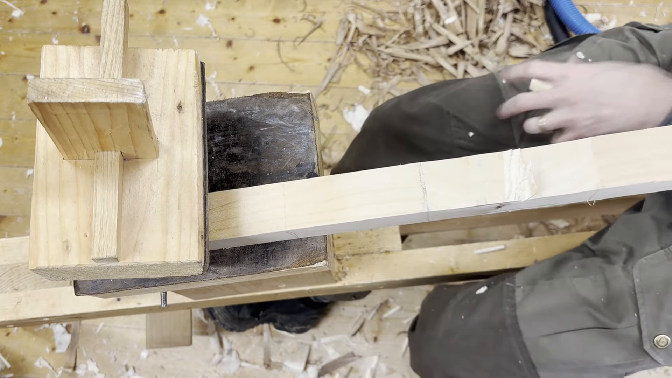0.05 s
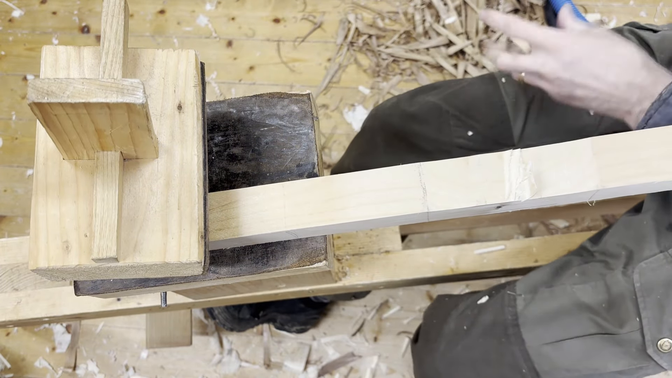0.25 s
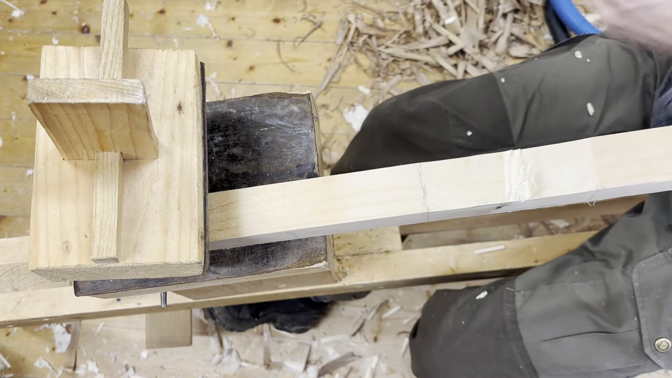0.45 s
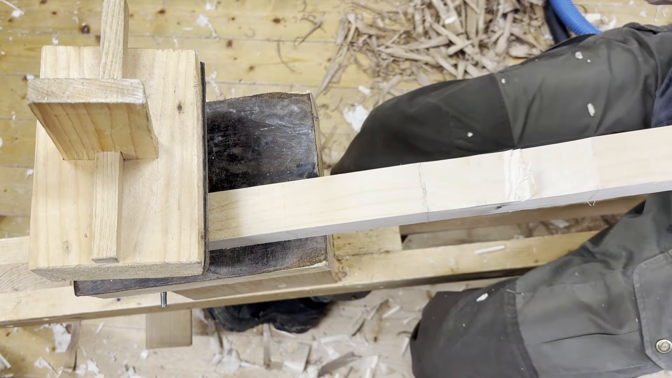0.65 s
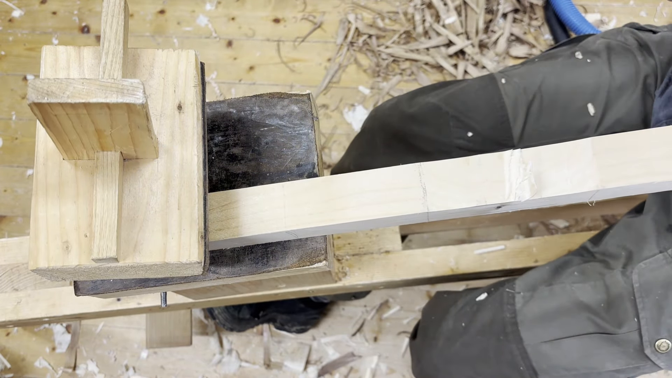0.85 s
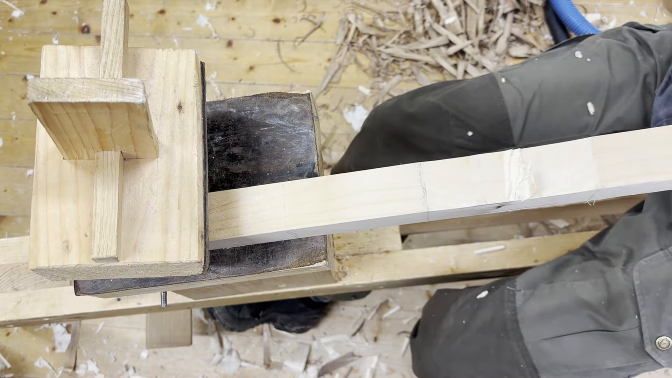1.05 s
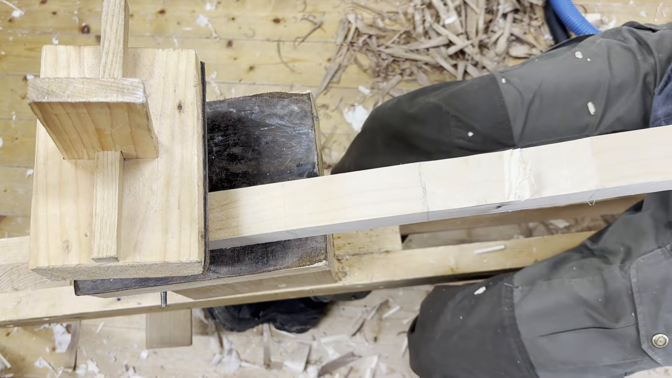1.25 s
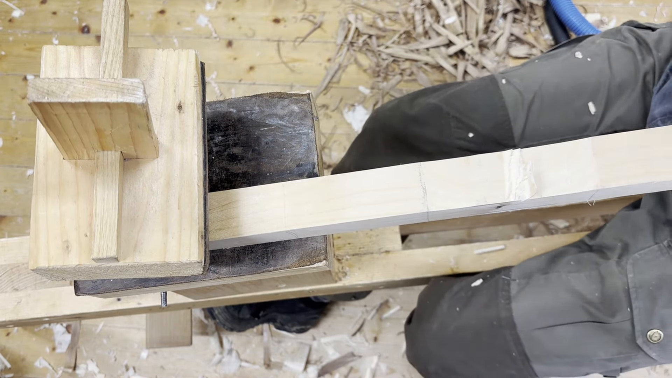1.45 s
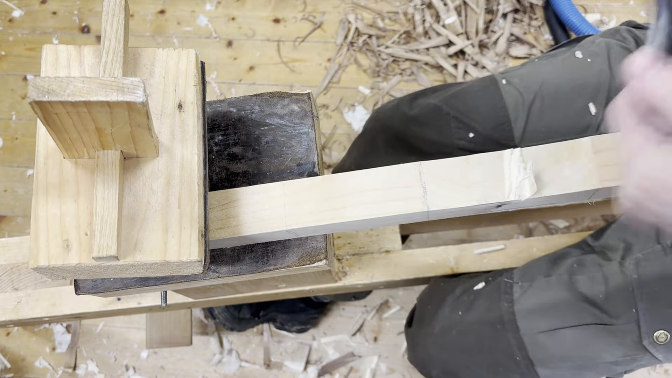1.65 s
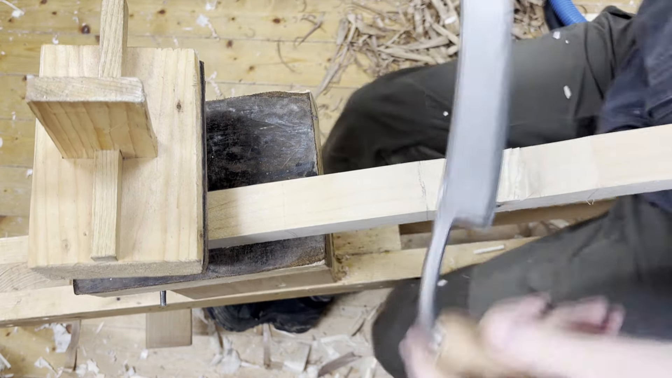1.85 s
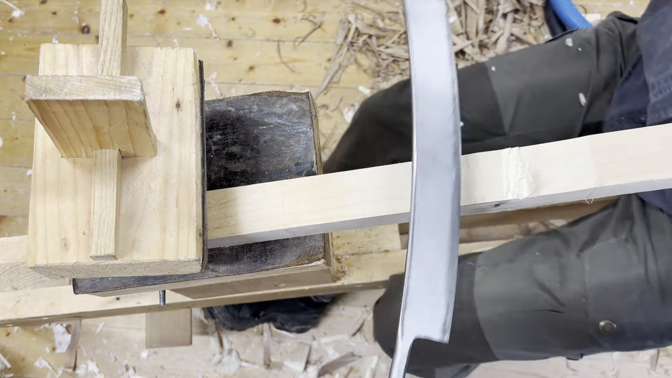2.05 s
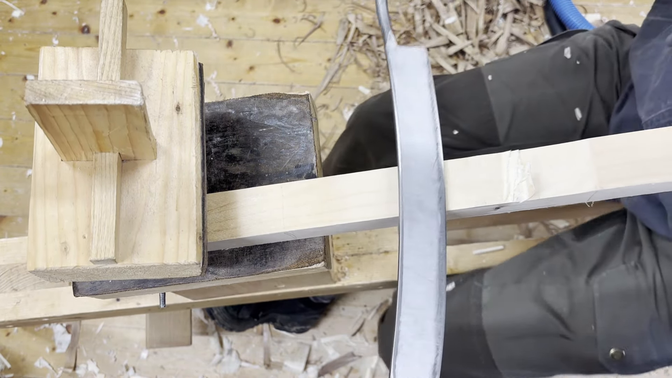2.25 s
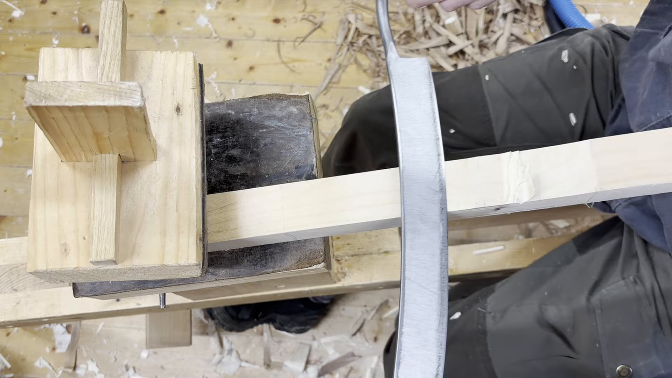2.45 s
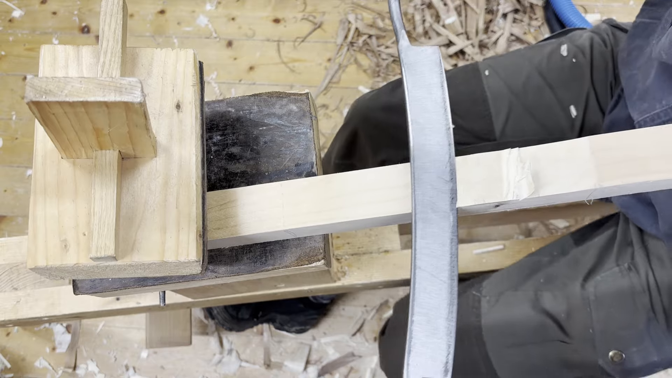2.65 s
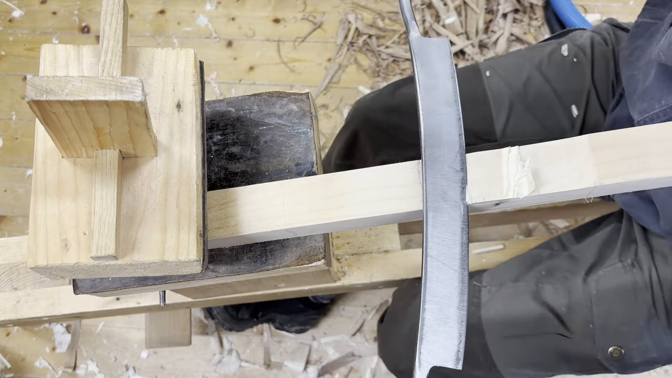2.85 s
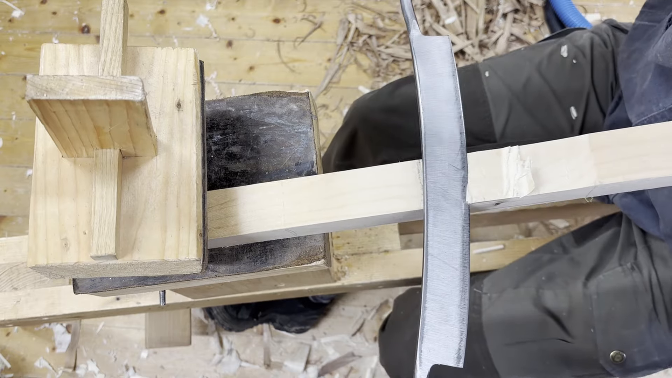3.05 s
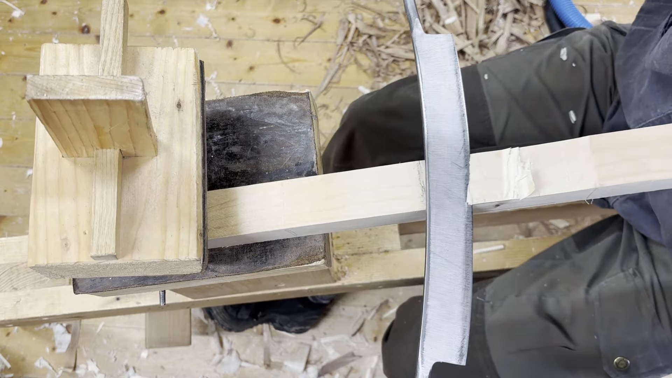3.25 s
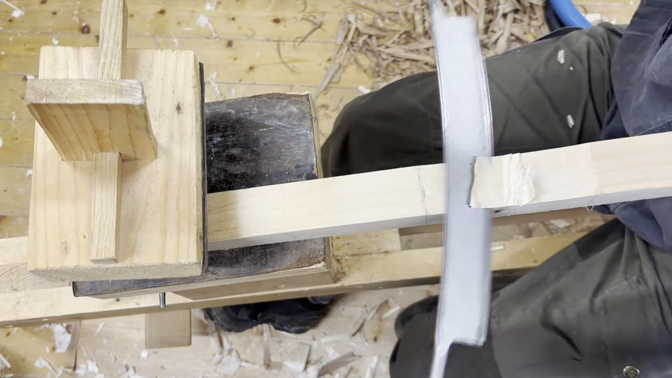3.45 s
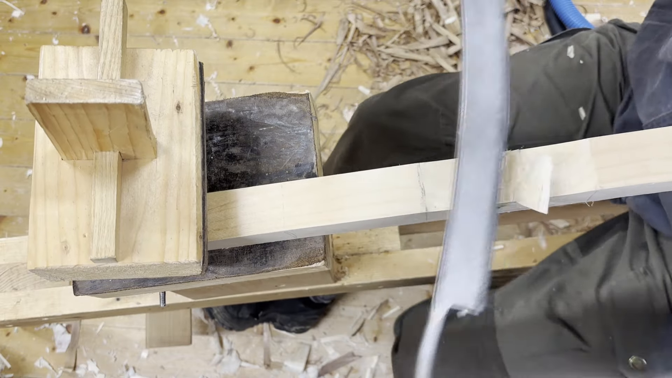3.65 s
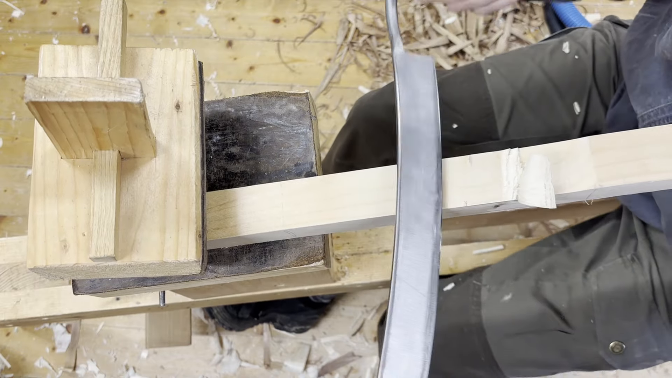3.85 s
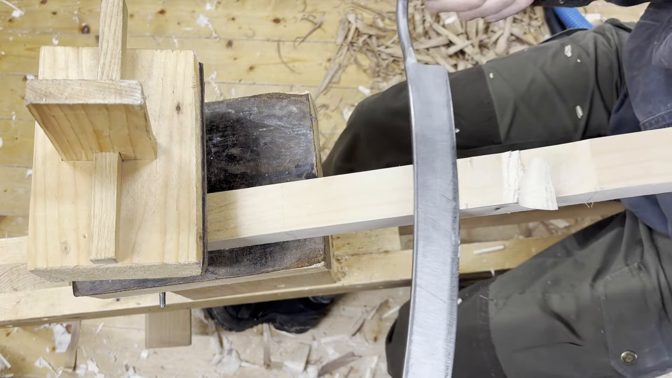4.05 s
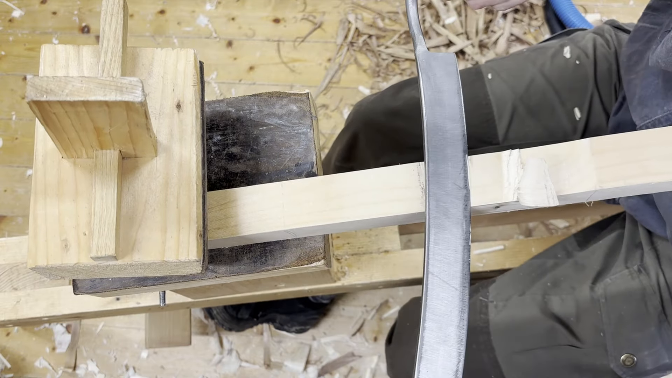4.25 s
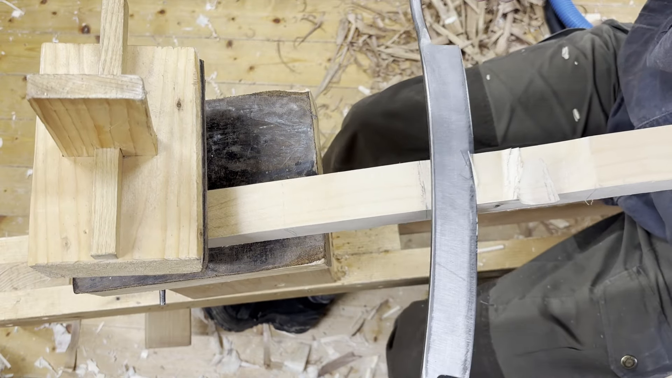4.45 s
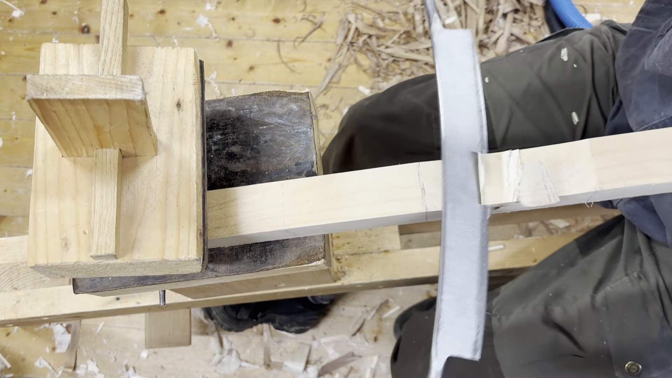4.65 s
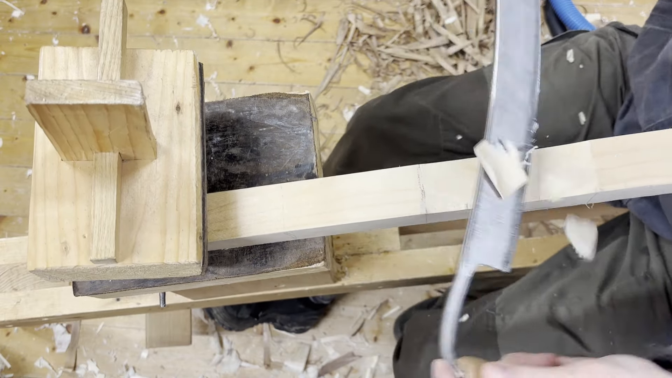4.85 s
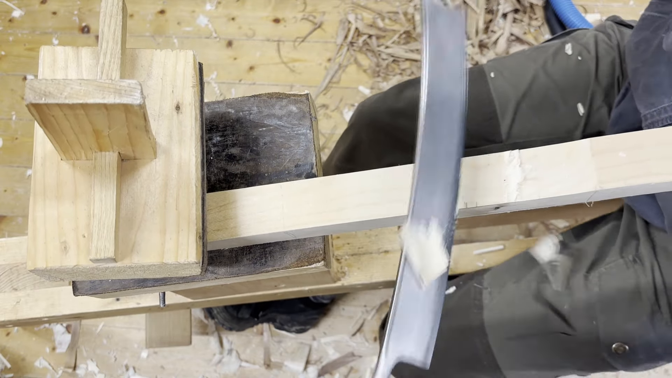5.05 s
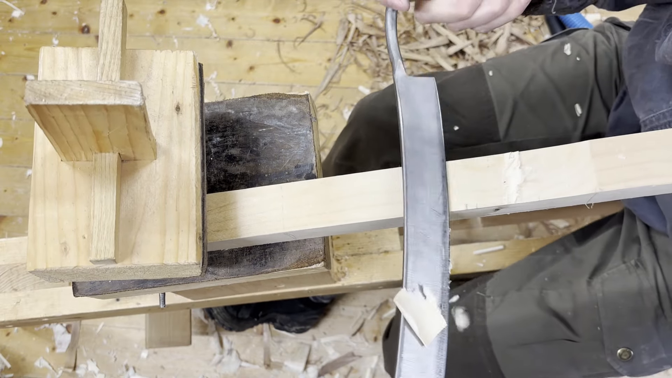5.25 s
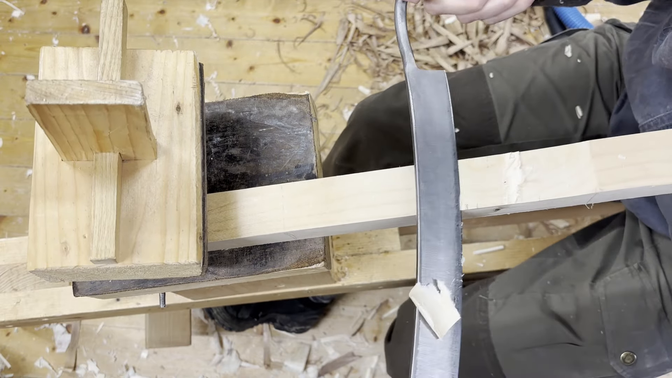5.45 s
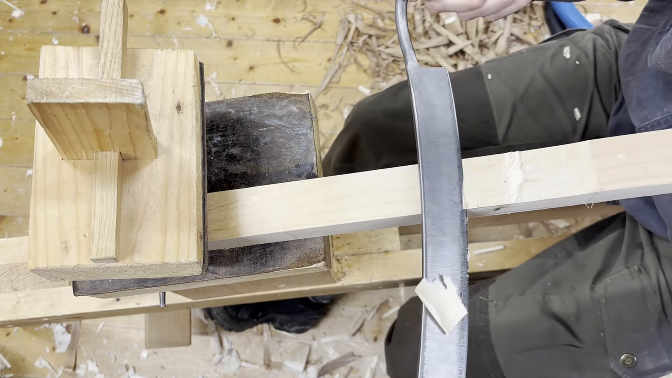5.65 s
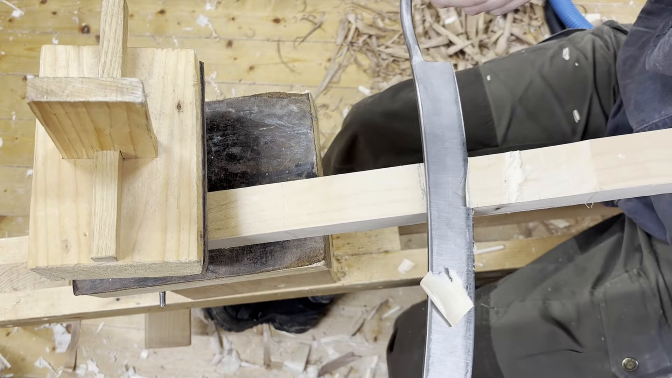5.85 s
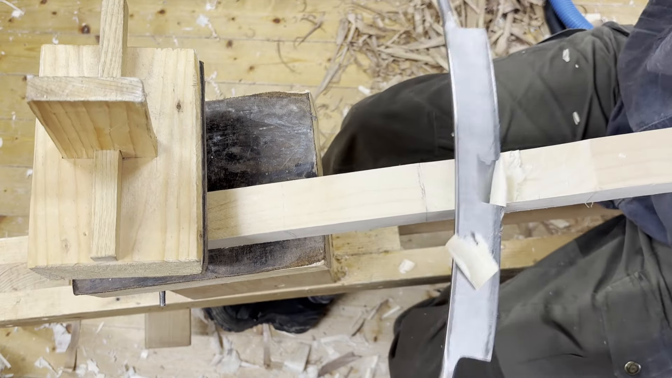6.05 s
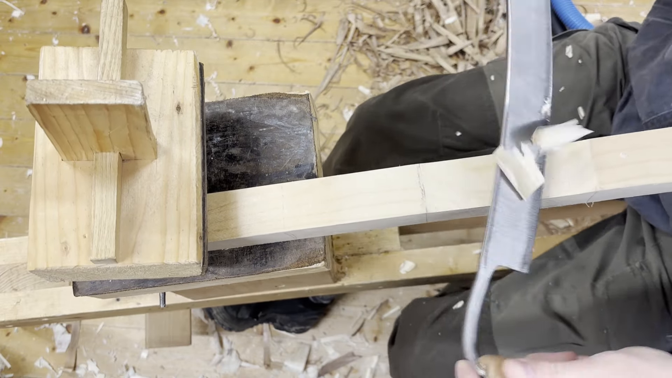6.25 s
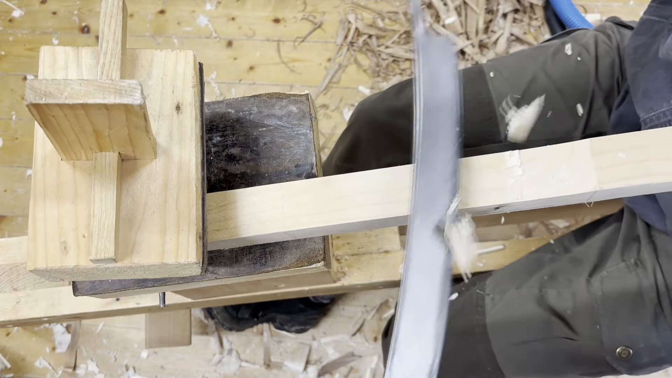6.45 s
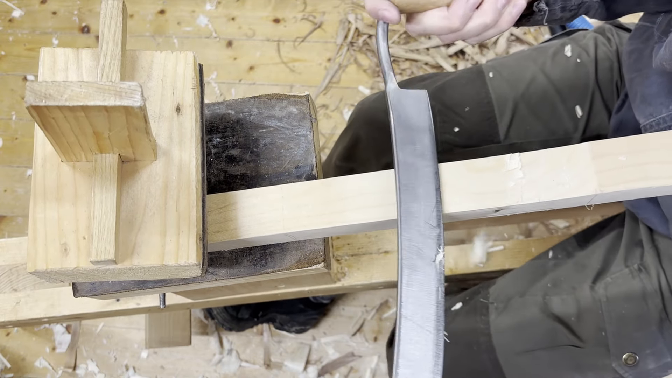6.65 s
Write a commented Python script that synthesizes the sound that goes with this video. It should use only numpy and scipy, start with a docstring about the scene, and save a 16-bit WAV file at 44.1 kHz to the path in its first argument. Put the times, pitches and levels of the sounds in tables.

```python
"""Clothes rustle and a tool knocks on wood at a shaving horse, then a drawknife is set down on a stick in a
brief scrape and makes three short cuts. In each the edge bites, the force builds and the chip gives:
ruptures crackle in clumps and shake the stick. Splinters snap as bright noise bursts; knocks excite decaying
modes and a rattle; thuds push the bench and set its frame ringing; cloth is grainy friction noise. A small,
dry workshop answers with decaying noise, heard from close above through two ports that differ in phase."""
import sys
import numpy as np
from scipy import signal
from scipy.fft import rfft, irfft, next_fast_len
from scipy.io import wavfile
from scipy.ndimage import uniform_filter1d, map_coordinates

SR = 44100
rng = np.random.default_rng(int(sys.argv[2]) if len(sys.argv) > 2 else 0)


def to_wav(s):
    """Save 16-bit WAV."""
    ch = np.atleast_2d(s).T  # columns
    pcm = np.round(np.clip(ch, -1, 1) * 32767)  # PCM
    wavfile.write(sys.argv[1], SR, pcm.astype(np.int16))


N = 295470

# the tool knocking on the stick: [start_s, level_db, contact_pitch_hz, contact_t60_s, crack_db, edge_tick_db]
CONTACTS = [(0.987, -46.5, 430, 0.04, -58, -70), (0.999, -45, 610, 0.07, -62, -83),
            (1.559, -48.5, 1600, 0.011, -53, -46.5), (1.689, -24, 630, 0.056, -26.5, -26),
            (1.752, -29, 600, .05, -35, -44), (1.909, -22, 1040, 0.024, -40, -35),
            (1.933, -21.5, 350, 0.04, -53, -55), (2.347, -27, 1010, 0.017, -36.5, -62),
            (2.352, -26, 640, 0.066, -56, -70), (2.394, -31, 360, 0.055, -67, -65),
            (2.859, -30.5, 1060, 0.012, -34, -31), (3.789, -43.5, 1088, 0.039, -54, -43),
            (4.018, -41.5, 840, 0.03, -54, -44), (4.771, -25, 520, 0.048, -29.5, -23),
            (5.045, -43.5, 550, 0.035, -53.5, -48.5), (5.232, -44, 840, 0.008, -50, -49),
            (5.311, -40.5, 1236, 0.036, -53, -43), (5.3273, -28, 681, 0.03, -33, -34),
            (5.41, -42, 1044, 0.025, -44.5, -33), (5.749, -25.5, 950, 0.015, -39, -28),
            (5.849, -43.5, 1020, 0.028, -51, -51), (6.025, -25.5, 850, 0.017, -39, -31),
            (6.536, -41.5, 567, 0.053, -43, -47)]
# resonances of the clamped stick: [mode_hz, relative_db, t60_s]
STICK_MODES = [(335, -4, 0.15), (450, 5.5, 0.17), (632, 0, 0.13), (765, -1, 0.08), (986, -1, 0.11),
               (1170, 0, .1), (1873, -3, 0.09), (2380, -3, 0.074)]
# spectrum of parting fibres: [frequency_hz, relative_db]
FIBRE_SPECTRUM = [(600, -39.5), (2000, -8), (2800, 7), (4200, -10.5), (5200, -.5), (6600, -4), (9300, -1.5),
                  (11800, 2), (13600, -4), (16000, 2.5)]
# spectrum of the bench's low rumble: [frequency_hz, relative_db]
RUMBLE_SPECTRUM = [(20, -13), (45, -7.5), (66, 9.5), (90, -4), (180, -5.5), (300, -10.5), (600, -39),
                   (2000, -86)]
# the loose joints of the bench rattling after a blow
RATTLE_LOW_HZ, RATTLE_T60_S = 171, 0.23


def amp(db):
    """Level to amplitude ratio: 20 dB is a factor of ten."""
    return 10 ** (np.asarray(db) / 20)


def unit(x):
    """Normalisation by effective value: scaled to rms 1."""
    return x / np.sqrt(np.mean(x ** 2) + 1e-20)


def along(points, hz):
    """Interpolation on a logarithmic frequency axis through (frequency_hz, value) points."""
    point_hz, value = np.transpose(points)
    return np.interp(np.log(hz + 1), np.log(point_hz), value)


def add(track, s, sound):
    """Superposition: mix a sound into a track at s seconds."""
    part = track[round(s * SR):][:len(sound)]
    part += sound[:len(part)]


def filtered(x, response):
    """Linear filtering: the spectrum of x times a complex response of frequency."""
    n = x.shape[-1]
    padded = next_fast_len(n + 8192)
    hz = np.fft.rfftfreq(padded, 1 / SR)
    return irfft(rfft(x, padded) * response(hz), padded)[..., :n]


def coloured(x, gain):
    """Minimum phase: x through the causal filter that has this gain of frequency."""
    size = 8192
    log_gain = np.log(np.maximum(gain(np.fft.rfftfreq(size, 1 / SR)), 1e-6))
    cepstrum = irfft(log_gain)
    # folding the cepstrum onto positive times makes the filter causal
    cepstrum[1:size // 2] *= 2
    cepstrum[size // 2 + 1:] = 0
    impulse_response = irfft(np.exp(rfft(cepstrum)))
    return signal.fftconvolve(x, impulse_response)[:len(x)]


def shaped(x, spectrum):
    """Spectral shaping: x filtered by (frequency_hz, relative_db) points, at rms 1."""
    return unit(coloured(x, lambda hz: amp(along(spectrum, hz))))


def wobble(rate):
    """Random modulation: straight lines between random knots, rate knots a second."""
    knots = rng.standard_normal(int(N * rate / SR) + 4)
    return map_coordinates(knots, [np.arange(N) * rate / SR], order=1)


def crackle(density, spread_db, clump_db):
    """Shot noise: tiny ruptures of uneven size, density a second, whose strength swells in clumps."""
    breaks = (rng.random(N) < density / SR) * rng.standard_normal(N)
    return breaks * amp(spread_db * rng.standard_normal(N) + clump_db * wobble(rate=320))


def patchy(x, patchy_db):
    """Spectral fluctuation: the level drifts at random over time and frequency."""
    z = signal.stft(x, nperseg=512)[2]
    field = uniform_filter1d(rng.standard_normal(z.shape), size=6, axis=0)
    field = uniform_filter1d(field, size=3, axis=1)
    return unit(signal.istft(z * amp(patchy_db * unit(field)), nperseg=512)[1][:N])


def band_noise(t, low_hz, top_hz):
    """Band limiting: noise of rms 1 that fades gently below low_hz and steeply above top_hz."""
    def band(hz):
        return hz ** 2 / (hz ** 2 + low_hz ** 2) / np.sqrt(1 + (hz / top_hz) ** 8)
    return unit(coloured(rng.standard_normal(len(t)), band))


def burst(noise, t, t60):
    """Exponential decay: noise that starts near rms 1 and falls 60 dB in t60 seconds."""
    fade = amp(-60 * t / t60)
    return noise * fade * np.linalg.norm(fade) / np.linalg.norm(noise * fade)


def stick_gain(hz, width_hz):
    """Modal response: the stick's resonances over a bed of densely packed modes."""
    # the bed of dense modes: [frequency_hz, relative_db]
    dense_modes = [(100, -21), (250, -12), (480, -2), (1050, -2), (1500, -7), (2200, 0), (3200, 1),
                   (6000, -23), (16000, -69)]
    peaks = sum(amp(db) / (1 + ((hz - centre_hz) / width_hz) ** 2) for centre_hz, db, _ in STICK_MODES)
    return amp(along(dense_modes, hz)) * (1 + 0.69 * peaks)


def sitter():
    """Friction noise: cloth rubs and swishes with each movement, knocks leave a scuff, the bench rumbles."""
    # hands, sleeves and trousers sliding: [centre_s, half_length_s, rub_db, swish_db]
    movements = [(0.042, 0.079, -54.5, -59), (0.161, 0.049, -86, -51.5), (0.635, 0.69, -69, -66.5),
                 (1.239, 0.077, -54.5, -57.5), (1.614, 0.041, -65, -57.5), (1.725, .03, -41, -49.5),
                 (1.904, 0.15, -53, -55), (2.5, 0.23, -59.5, -62), (3.1, .2, -68, -72),
                 (3.322, 0.04, -54.5, -56), (3.72, 0.08, -63, -61), (4.038, 0.03, -54, -70),
                 (4.164, 0.082, -55, -61.5), (4.389, 0.032, -57, -57.5), (4.572, 0.045, -51.5, -50.5),
                 (4.92, 0.12, -58, -63.5), (5.438, 0.046, -59.5, -58), (5.772, 0.18, -59.5, -59.5),
                 (5.984, 0.043, -51.5, -49.5), (6.17, .035, -49, -47.5), (6.53, 0.18, -60, -66.5)]
    # the bench shifting under the sitter: [time_s, rumble_db]
    weight_shifts = [(0, -71), (1.55, -72), (1.84, -45), (2.15, -56), (3.1, -67), (4.2, -63), (6.7, -68)]
    # spectrum of rubbing cloth: [frequency_hz, relative_db]
    rub_spectrum = [(100, -23.5), (300, 3), (900, 2), (1400, -3), (2200, -4.5), (3000, -11), (16000, -29.5)]
    # spectrum of swishing cloth: [frequency_hz, relative_db]
    swish_spectrum = [(1000, -7.5), (3000, 0.5), (4400, -3.5), (5300, 3.5), (7000, 1), (13000, 2),
                      (16000, -13)]
    scuff_db, scuff_fade_s = -21, 0.017  # level against the knock; fading time of the power to 1/e
    t = np.arange(N) / SR
    # a faint, wavering floor; unrelated movements add as powers
    rub_power = amp(-72 + 2 * wobble(rate=10)) ** 2
    swish_power = amp(-79 + 2 * wobble(rate=10)) ** 2
    for s, half, rub_db, swish_db in movements:
        swell = np.exp(-((t - s) / half) ** 2)
        rub_power += amp(rub_db) ** 2 * swell
        swish_power += amp(swish_db) ** 2 * swell
    for s, db, *_ in CONTACTS:
        scuff = (t > s) * np.exp(-np.abs(t - s) / scuff_fade_s)
        rub_power += amp(db + scuff_db) ** 2 * scuff
    rub_grains = patchy(crackle(density=8000, spread_db=0.5, clump_db=1.0), patchy_db=2.0)
    rub = np.sqrt(rub_power) * shaped(rub_grains, rub_spectrum)
    swish_grains = crackle(density=19000, spread_db=1.0, clump_db=2)
    swish = np.sqrt(swish_power) * shaped(swish_grains, swish_spectrum)
    shift_s, shift_db = np.transpose(weight_shifts)
    # the rubbing also shakes the bench
    rumble_level = amp(np.interp(t, shift_s, shift_db)) + amp(-13.0) * np.sqrt(rub_power)
    return rub + swish + rumble_level * shaped(rng.standard_normal(N), RUMBLE_SPECTRUM)


def snaps():
    """Impulsive release: a splinter lets go or the edge ticks in one bright burst that rings the stick."""
    # splinters snapping: [start_s, level_db before the common trim, t60_s, centre_hz]
    splinters = [(0.135, -24, 0.0029, 12000), (.715, -45, 0.4, 7950), (2.85, -32.5, 0.01, 7000),
                 (3.5145, -16.5, 0.006, 12100), (3.5205, -17, 0.011, 10100), (3.559, -22, .008, 8000),
                 (3.747, -36, 0.079, 8900), (4.112, -35, .04, 6400), (4.7302, -8, 0.004, 11000),
                 (4.7311, -7, 0.011, 9100), (4.743, -1.5, 0.002, 12000), (4.761, -15, .004, 9000),
                 (4.851, -27.5, 0.025, 8400), (5.297, -44, .05, 6000), (5.996, -21, 0.007, 9000),
                 (6.121, -18, .015, 12000), (6.127, -16.5, 0.017, 5000), (6.36, -32, 0.013, 10100)]
    # the edge's tick, a sharp snap then a short fizz: [level_db against the tick, t60_s]
    tick_parts = [(2, .005), (-1.5, 0.045)]
    tick_hz, trim_db = 5440, -5.5
    ring_db, ring_top_hz = -24.5, 1500  # ring against the bursts; mostly below this pitch
    out, t = np.zeros(N), np.arange(SR // 8) / SR
    ticks = [(s, tick_db + db, t60, tick_hz) for s, *_, tick_db in CONTACTS for db, t60 in tick_parts]
    for s, db, t60, centre_hz in splinters + ticks:
        def colour(hz):
            detuning = hz / centre_hz - centre_hz / (hz + 1)
            return amp(along(FIBRE_SPECTRUM, hz)) / np.hypot(1, detuning)
        noise = coloured(rng.standard_normal(len(t)), colour)
        add(out, s, amp(db + trim_db) * burst(noise, t, t60))
    ring = unit(coloured(out, lambda hz: stick_gain(hz, width_hz=22) / (1 + hz / ring_top_hz)))
    return out + amp(ring_db) * np.std(out) * ring


def knocks():
    """Impact excitation: a crack and a tock pitched by hardness; the stick rings on, the bench rattles."""
    crack_low_hz, crack_top_hz, crack_t60_s = 804, 2320, 0.028
    ring_db, rattle_db = -6, -11  # before scaling to the energy of the tock
    rattle_top = 0.78  # times the contact pitch
    out, t = np.zeros(N), np.arange(SR // 3) / SR
    mode_hz, mode_db, t60 = np.transpose(STICK_MODES)[:, :, None]
    for s, db, pitch_hz, tock_s, crack_db, _ in CONTACTS:
        tock = np.sin(2 * np.pi * pitch_hz * t) * amp(-60 * t / tock_s)
        crack = burst(band_noise(t, crack_low_hz, crack_top_hz), t, crack_t60_s)
        # a soft, low contact excites the high modes less
        share = amp(mode_db + rng.normal(0, 3.5, t60.shape)) / (1 + (mode_hz / pitch_hz) ** 2)
        swing = np.sin(2 * np.pi * (mode_hz * t + rng.random(t60.shape))) * amp(-60 * t / t60)
        ring = (share * swing).sum(0) / np.linalg.norm(share)
        rattle = burst(band_noise(t, RATTLE_LOW_HZ, rattle_top * pitch_hz), t, RATTLE_T60_S)
        energy_scale = np.sqrt(tock_s / RATTLE_T60_S)
        body = tock + energy_scale * (amp(ring_db) * ring + amp(rattle_db) * rattle)
        onset = 1 - np.exp(-2 * np.pi * pitch_hz * t)
        add(out, s, amp(db) * body * onset + amp(crack_db) * crack)
    return out


def thuds():
    """Forced then free vibration: soft blows shove the bench once and set its frame ringing and rattling."""
    # heavy, soft blows, pitch shifting with the load: [start_s, ring_db, pitch_hz, rise_s, low_push_db]
    blows = [(0.995, -44, 188.5, 0.0097, -51), (1.706, -20.5, 160, 0.009, -40),
             (1.732, -14, 177, 0.0018, -13.5), (1.915, -14.8, 170.5, 0.008, -42),
             (1.978, -31, 176, 0.0095, -54), (3.711, -44, 158, 0.026, -40.5),
             (3.953, -44, 200.6, 0.003, -74), (4.026, -35.5, 153, 0.0057, -40),
             (4.775, -24, 161.7, 0.0084, -53), (5.357, -51, 175, 0.0073, -37.5),
             (6.021, -42, 170.6, 0.017, -38), (6.561, -38.5, 171.4, 0.0039, -38.5)]
    # modes of the unloaded bench frame: [multiple of the pitch, relative_db, unloaded_t60_s]
    frame_modes = [(.4, -12, .22), (.72, -6, 0.14), (.87, -4.5, 0.28), (1, 2.5, 0.225), (1.42, -15, .15),
                   (1.7, -15, 0.15), (1.93, -14.5, 0.19), (3.36, -25, 0.25)]
    loaded = 0.81  # share of the ring time left with the sitter's weight on the frame
    rattle_db, rattle_top_hz = -31, 440  # half the ring's level in dB is added to rattle_db
    out, t = np.zeros(N), np.arange(SR // 2) / SR
    for s, db, pitch_hz, rise, push_db in blows:
        ring = np.zeros(len(t))
        for multiple, mode_db, t60 in frame_modes:
            decay = amp(mode_db + rng.normal(0, 1) - 60 * t / (t60 * loaded))
            ring += decay * np.sin(2 * np.pi * pitch_hz * multiple * t)
        onset = 1 - np.exp(-(t / rise) ** 2)
        rattle = burst(band_noise(t, RATTLE_LOW_HZ, rattle_top_hz), t, RATTLE_T60_S)
        # softer thuds rattle less, but by half as many dB: the rattle is relatively stronger in soft blows
        ring_level = amp(db) / np.abs(onset * ring).max()
        frame = onset * (ring_level * ring + amp(rattle_db + db / 2) * rattle)
        u = (t - .007) / 0.0019  # push centred 7 ms after the start
        push = (u ** 2 - 1) * np.exp(-u ** 2 / 2)
        add(out, s, frame + amp(push_db) * push)
    return out


def squeak(s, half, pitch_hz, rise_hz_per_s, db):
    """Frequency modulation: a faint, rough squeak that rises as the grip on the tool tightens."""
    t = np.arange(N) / SR - s
    hz = (pitch_hz + rise_hz_per_s * t) * (1 + .05 * wobble(rate=400))
    return amp(db) * np.exp(-(t / half) ** 2) * np.sin(2 * np.pi * np.cumsum(hz) / SR)


def pull_db(bite, bite_s, give, build, release):
    """Load and release: the level climbs from the bite until the give, then falls (both dB a second)."""
    t = np.arange(N) / SR
    bitten = np.clip((t - bite) / bite_s, 1e-6, 1)
    return 20 * np.log10(bitten) + np.minimum(build * (t - give), release * (give - t))


def cuts():
    """Fracture noise: each rupture hisses at the blade and shakes the stick; the pull shakes the bench."""
    # the edge set down on the wood in a brief scrape (first row, no build), then pulled into it:
    # [bite_start_s, bite_length_s, chip_gives_s, tearing_db, stick_body_db]
    pulls = [(2.848, 0.0036, 2.848, -39.5, -39.5), (3.409, 0.004, 3.515, -32.5, -46.5),
             (3.535, 0.006, 3.565, -36, -46), (4.645, 0.041, 4.728, -36, -49.5),
             (4.73, 0.002, 4.772, -28.5, -39.5), (5.987, 0.0056, 6.005, -34.5, -40),
             (6.025, .01, 6.06, -39.5, -41.5), (6.101, 0.011, 6.13, -30.5, -42)]
    # tearing builds with the force; when the chip gives it drops quickly, then dies away
    build, release = 147, 233  # dB a second
    drop_db, drop_s = 4, 0.01
    # the stick shakes almost evenly while the edge is in it
    body_build, body_release = 4, 237  # dB a second
    # the heavy bench follows late and settles slowly
    bench_db, bench_lag_s, bench_release = -17, 0.014, 115  # against the tearing; s; dB a second
    ruptures = patchy(crackle(density=7000, spread_db=3.3, clump_db=3.3), patchy_db=3.5)
    tearing = shaped(ruptures, FIBRE_SPECTRUM)
    stick = unit(coloured(ruptures, lambda hz: stick_gain(hz, width_hz=11.0)))
    rumble = shaped(rng.standard_normal(N), RUMBLE_SPECTRUM)
    t, levels = np.arange(N) / SR, []
    for bite, bite_s, give, tear_db, body_db in pulls:
        drop = drop_db * np.clip((t - give) / drop_s, 0, 1)
        tear_level = tear_db - drop + pull_db(bite, bite_s, give, build, release)
        body_level = body_db + pull_db(bite, bite_s, give, body_build, body_release)
        bench_pull = pull_db(bite, bite_s, give + bench_lag_s, build, bench_release)
        levels.append([tear_level, body_level, tear_db + bench_db + bench_pull])
    # at each instant the strongest row sets the level
    return (amp(np.max(levels, axis=0)) * [tearing, stick, rumble]).sum(0)


def tail():
    """Reverberation: diffuse noise in which each frequency of the workshop dies at its own speed."""
    # reverberation of the workshop: [frequency_hz, t60_s]
    reverberation = [(300, 0.31), (3000, 0.068), (15000, 0.13)]
    hz, t, z = signal.stft(rng.standard_normal(SR // 2), SR, nperseg=256)
    decay = amp(-60 * t / along(reverberation, hz)[:, None])
    echo = signal.istft(z * decay, SR, nperseg=256)[1]
    delay = np.zeros(SR // 200)  # 5 ms before the first answer
    return np.concatenate([delay, echo / np.linalg.norm(echo)])


def ports(shared, diffuse):
    """Partial coherence: diffuse sound reaches two microphone ports unalike, and they differ in phase."""
    # phase between the ports: [frequency_hz, left_lead_rad]
    phase_lead = [(200, 0), (1000, -.6), (1800, .1), (2800, 2.9), (3200, 2.4), (3800, 1.1), (4900, .9),
                  (5750, 3.1), (7150, 5.3), (8500, 6.6), (10700, 9.4), (13200, 12.4), (14200, 13.1),
                  (15800, 15.6)]
    # gain of the part that differs between the ports: [frequency_hz, unrelated_db]
    unrelated = [(100, -24), (300, -8.5), (900, -9.5), (4500, -4.5), (5800, -18), (15000, -24)]
    side = coloured(diffuse, lambda hz: amp(along(unrelated, hz)))
    pair = np.array([shared + side, shared - side])
    signs = np.array([[1], [-1]])  # half of the lead to each port
    return filtered(pair, lambda hz: np.exp(.5j * along(phase_lead, hz) * signs))


def scene():
    """Superposition: blade, wood, bench and sitter, with the diffuse answer of the workshop."""
    blade = cuts() + snaps()
    wood = knocks() + squeak(s=1.86, half=0.018, pitch_hz=1345, rise_hz_per_s=1300, db=-49)
    bench = thuds()
    sent = amp(-4.5) * blade + amp(-6.5) * wood + amp(-15.5) * bench
    room, room_across = (signal.fftconvolve(sent, tail())[:N] for _ in range(2))
    # a second, independent draw of the cloth spreads it across the ports
    return ports(blade + wood + bench + room + sitter(), amp(4.0) * room_across + sitter())


def record(dry):
    """Band limiting: the deepest bass is thinned and a steep edge removes the highest treble."""
    top_hz = 15800
    thinned = signal.sosfilt(signal.butter(2, 52, "highpass", fs=SR, output="sos"), dry)
    return filtered(thinned, lambda hz: 1 / np.sqrt(1 + (hz / top_hz) ** 160))


dry = scene()
out = record(dry)
to_wav(out)
```